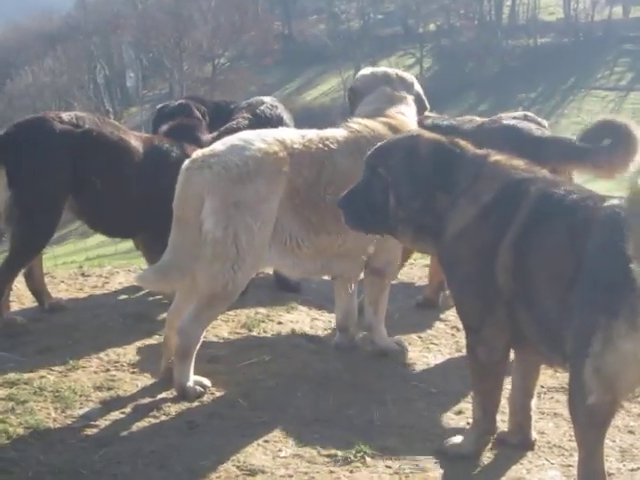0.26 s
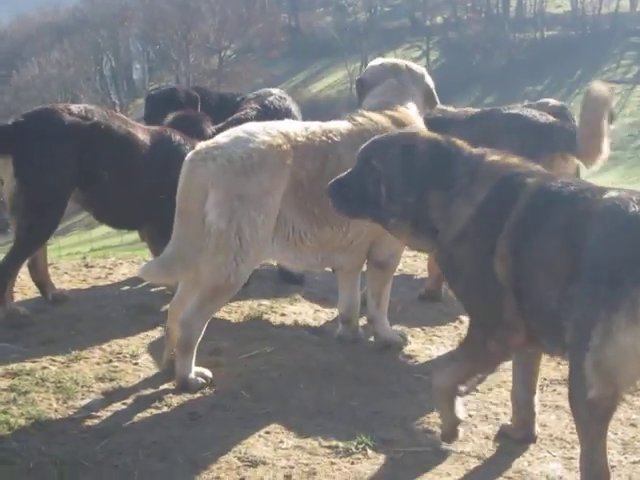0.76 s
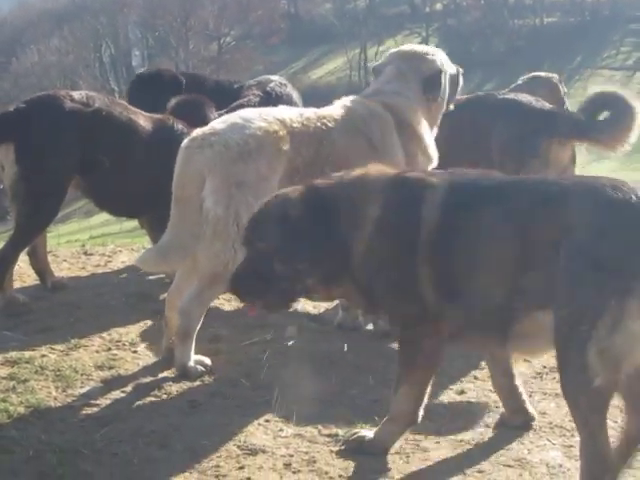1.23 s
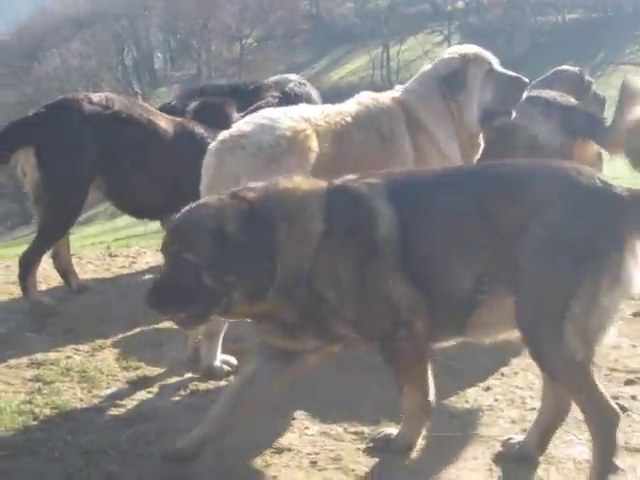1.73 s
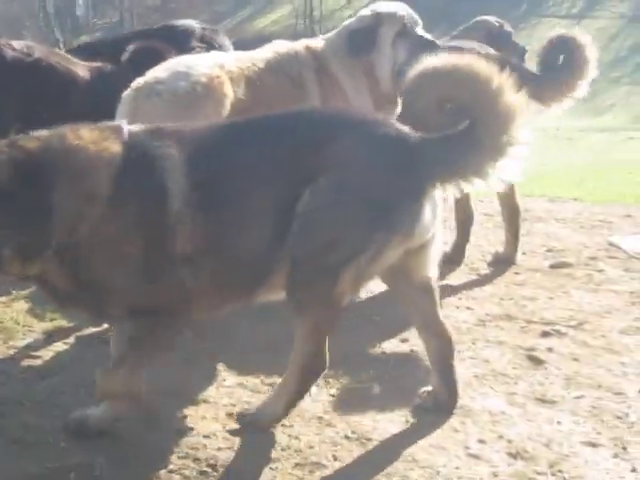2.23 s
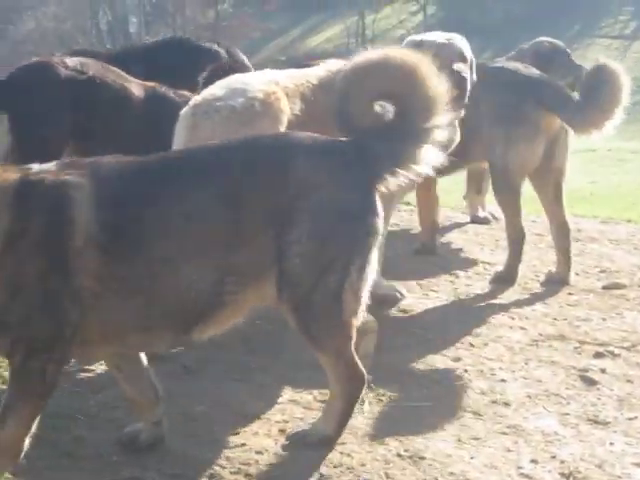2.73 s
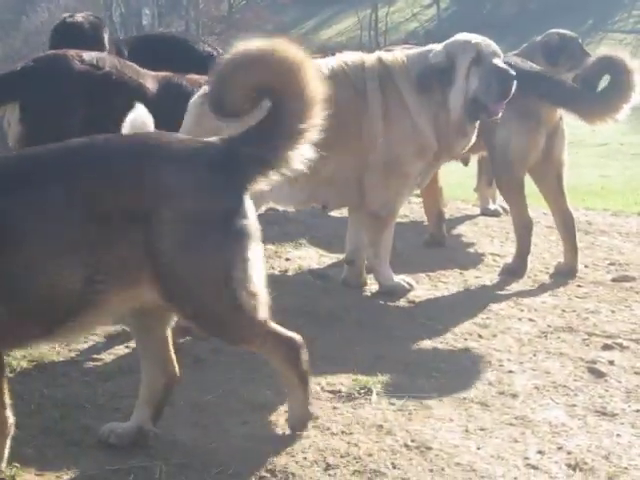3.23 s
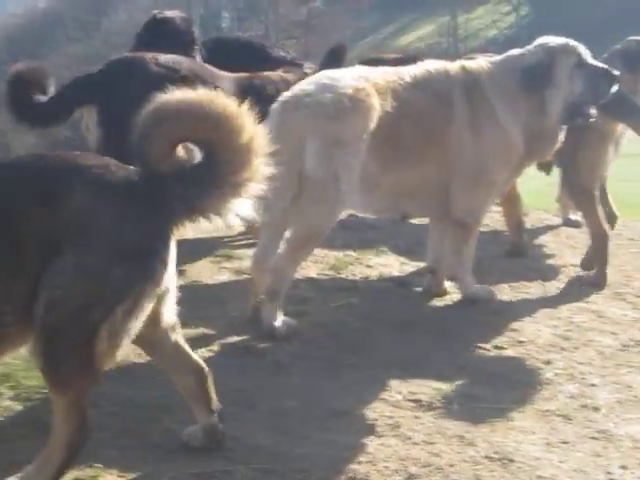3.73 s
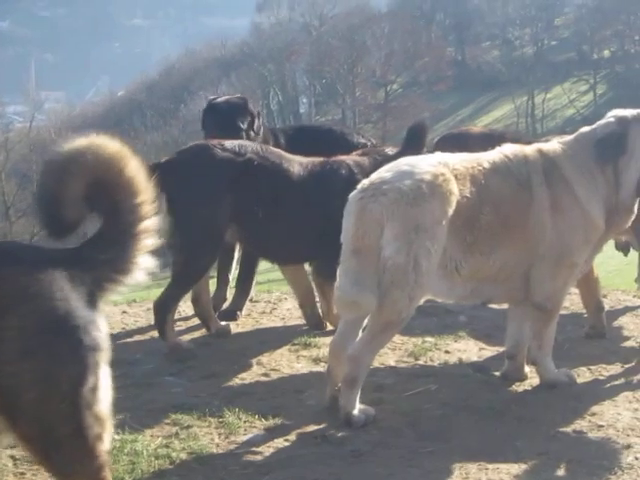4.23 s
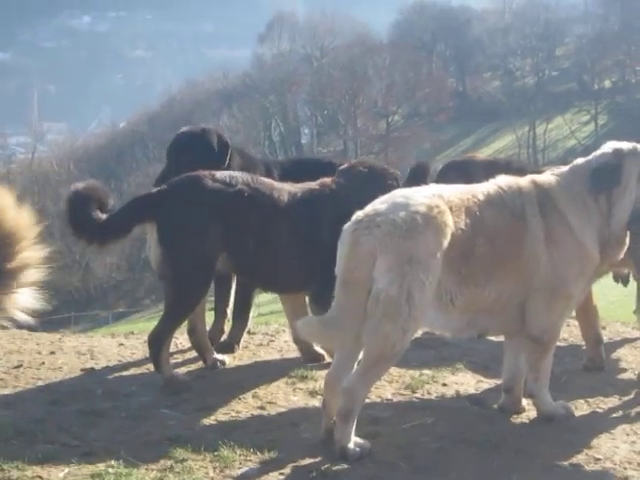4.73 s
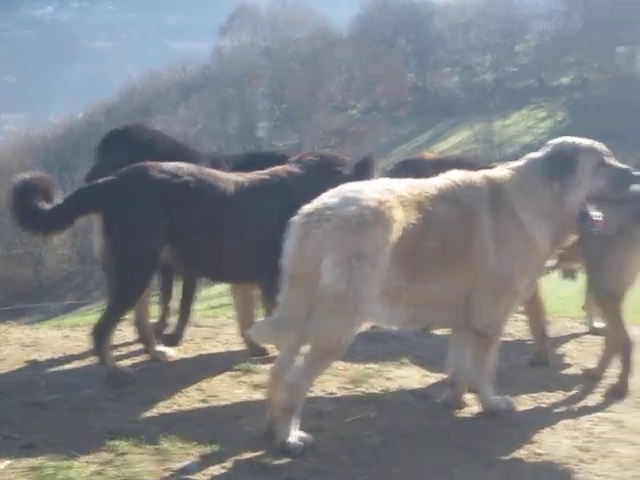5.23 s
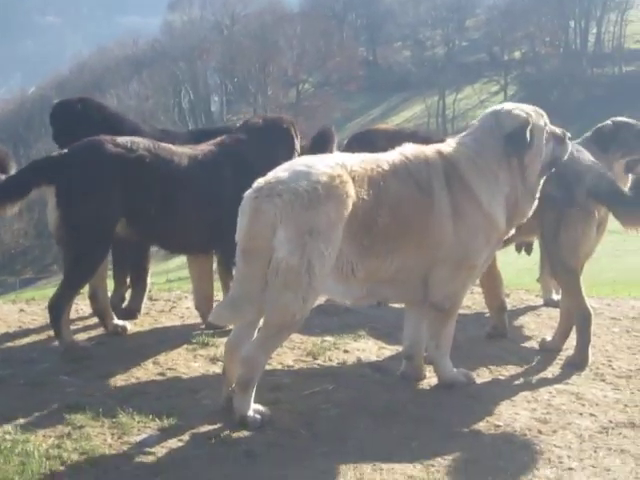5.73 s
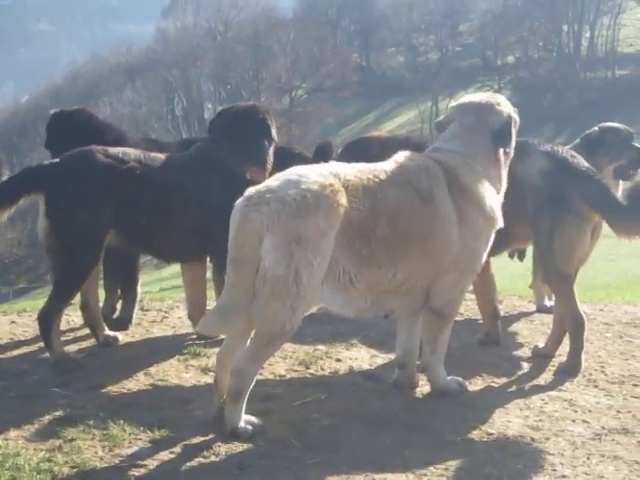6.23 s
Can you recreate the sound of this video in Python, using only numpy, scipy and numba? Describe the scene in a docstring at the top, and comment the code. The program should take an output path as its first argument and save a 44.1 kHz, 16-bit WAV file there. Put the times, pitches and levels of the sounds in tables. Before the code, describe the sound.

On an open hillside, large dogs growl low while paws scrape dry grit. Two of them bark hoarsely together a little after one second, again at two and a half, then at four and a half and five and a half. A short squeal follows the third outburst, thin nasal whines slide about, and faint birds chirp. A small camera microphone gives a slightly dull top and soft background noise.

```python
"""Dogs barking on an open hillside

Two large dogs overlap in hoarse barks: chaotic fold pulses through resonances, rasping breath, partials on top.
A squeal and thin nasal whines are gliding partials; a low growl is slow fold pulses ringing chest, throat, mouth.
Paws scuff dry soil in bursts of grains, small birds chirp on pitch curves, banded noise makes the far air.
A small camera microphone adds faint steady tones, gain control and a cut top."""
import sys
import numpy as np
from scipy import signal
from scipy.io import wavfile
from scipy.ndimage import uniform_filter1d
from numba import njit

SR = 44100
rng = np.random.default_rng(int(sys.argv[2]) if len(sys.argv) > 2 else 0)


def generate_wav(sig):
    """Save sig (samples, or channels by samples) to the path in sys.argv[1] as 16-bit PCM at SR."""
    pcm = np.round(np.clip(np.atleast_2d(sig).T, -1, 1) * 32767).astype(np.int16)
    wavfile.write(sys.argv[1], SR, pcm)


N = 285627


def amp(db):
    """Decibels to gain."""
    return 10 ** (np.asarray(db) / 20)


def rms_one(x):
    """Scale to rms 1."""
    return x / np.sqrt(np.mean(x ** 2) + 1e-20)


def drift(rate_hz, size):
    """Slow chance with rms 1: white noise through two equal one-pole lowpasses."""
    r = np.exp(-2 * np.pi * rate_hz / SR)
    settle = 8000
    noise = rng.standard_normal(size + settle)
    return rms_one(signal.lfilter([1], [1, -2 * r, r * r], noise)[settle:])


def unroll(rows):
    """A table as a slice of time, a 6 ms fade at both ends and its columns sample by sample."""
    s, *columns = np.transpose(rows)
    at = np.arange(round(s[0] * SR), min(round(s[-1] * SR), N))
    fade = np.clip(np.minimum(at - at[0], at[-1] - at) / (.006 * SR), 0, 1)
    return slice(at[0], at[-1] + 1), fade, [np.interp(at / SR, s, c) for c in columns]


@njit
def sweep(x, turn, r):
    """Two-pole resonance whose centre (radians a sample) may move; gain about 1 on top."""
    y = np.zeros(len(x))
    for i in range(2, len(x)):
        drive = (1 - r * r) / 2 * (x[i] - x[i - 2])
        y[i] = drive + 2 * r * np.cos(turn[i]) * y[i - 1] - r * r * y[i - 2]
    return y


def resonate(x, hz, width_hz):
    """A resonance applied twice, so that the valleys stay dark; the width is that of one pass."""
    turn = 2 * np.pi * hz / SR * np.ones(len(x))
    r = np.exp(-np.pi * width_hz / SR)
    return sweep(sweep(x, turn, r), turn, r)


def modes(x, table):
    """Parallel resonances (Hz, width Hz, dB), signs alternating."""
    return sum((-1) ** k * amp(db) * rms_one(resonate(x, hz, width_hz))
               for k, (hz, width_hz, db) in enumerate(table))


def vocal_folds(hz, jitter, breath, spread_db):
    """One pulse a cycle, uneven in time and size, with breath noise released by each opening."""
    phase = np.cumsum(hz * np.exp(jitter * drift(60, len(hz)))) / SR
    pulses = np.diff(np.floor(phase), prepend=0) * amp(spread_db * rng.standard_normal(len(hz)))
    puffs = signal.lfilter([1], [1, -.993], pulses) * rng.standard_normal(len(hz))
    return rms_one(pulses) + breath * rms_one(puffs)


def evened(x, window_s):
    """Divide out the slow level, keep the pulses."""
    return x / np.sqrt(uniform_filter1d(x ** 2, size=round(window_s * SR)) + 1e-12)


def shaped(shape, calls):
    """One shape of glide and loudness, stretched over each call."""
    return [[(s + share * length, first + glide * (last - first), *np.add(db, shape_db))
             for share, glide, *shape_db in shape]
            for s, length, first, last, *db in calls]


def tones(calls, wobble, flutter_db, overtones_db=()):
    """Partials on a pitch curve that wobbles a little; each partial flutters by itself."""
    out = np.zeros(N)
    for rows in calls:
        at, fade, (hz, *partials) = unroll(rows)
        phase = 2 * np.pi * np.cumsum(hz * np.exp(wobble * drift(70, len(hz)))) / SR
        partials += [partials[-1] + db for db in overtones_db]   # higher partials follow the last given one
        for k, db in enumerate(partials, 1):
            level = amp(db + flutter_db * drift(24, len(hz)))
            out[at] += fade * np.sqrt(2) * level * np.sin(k * phase + rng.uniform(0, 2 * np.pi))
    return out


def bark_course(s, held_s, fall_db_per_s, db, shift_db, throat_hz, mouth_db, mouth_hz, end_hz, rasp_db):
    """Effort climbs, holds and falls; the mouth opens on the climb, the throat resonance sags while held."""
    range_db, rise_db_per_s = 30, 270
    mouth_shut_db, mouth_shut_ratio = -23, 0.82   # at the start of the climb
    low_throat_shut_db = -5.5   # the low throat resonance fades while the effort is held
    low_db = db - range_db
    sag_hz = 600 * held_s
    soft_db = rasp_db - 3.5   # weaker rasp on the climb and at both ends of the hold
    start = (s - range_db / rise_db_per_s, low_db, 0, throat_hz,
             mouth_db + mouth_shut_db, mouth_hz * mouth_shut_ratio, soft_db)
    full = (s, db, 0, throat_hz, mouth_db, mouth_hz, soft_db)
    # the rasp itself does not follow the level shift
    middle = (s + held_s / 2, db + shift_db, low_throat_shut_db, throat_hz - sag_hz / 2,
              mouth_db, mouth_hz, rasp_db - shift_db)
    release = (s + held_s, db, low_throat_shut_db, throat_hz - sag_hz, mouth_db, mouth_hz, soft_db)
    end = (s + held_s + range_db / fall_db_per_s, low_db, low_throat_shut_db, throat_hz - sag_hz,
           mouth_db, end_hz, rasp_db)
    return [start, full, middle, release, end]


def hoarse_barks():
    """Chaotic fold pulses ring the throat and the opening mouth; turbulent breath rasps in the upper resonances."""
    # Each row: full effort from in seconds, hold in seconds, fall in dB/s, relative effort level in dB,
    # level shift at mid-hold in dB, throat in Hz, relative mouth level in dB, mouth in Hz while held,
    # mouth in Hz at the end, relative rasp level in dB, narrow-throat level within the rasp in dB.
    barks = [(1.32, .12, 111, -22.5, -7, 520, 10.5, 1140, 1350, -14, -5.5),
             (1.665, 0.014, 234.5, -25.5, -3, 648, -14, 1210, 1230, -22, -13),
             (1.81, 0.066, 160, -26.5, 2, 640, -13, 1160, 1140, -28, -6),
             (2.515, 0.067, 402, -22, 2, 580, 8, 1242, 1210, -19.5, 1),
             (4.58, .11, 217.5, -17.5, 0.5, 626, -4.5, 1160, 980, -26, -2.5),
             (5.495, 0.11, 201, -23.5, 4, 533, 10.5, 1146, 1040, -35, -8)]
    # Upper throat resonances. Each row: centre in Hz, width in Hz, level in dB.
    rasp_modes = [(1900, 400, 5), (2450, 400, 1), (3300, 600, -5), (5400, 800, -13), (8000, 6000, -20)]
    # Low throat resonance: centre in Hz, width in Hz, level in dB re throat before it fades.
    low_hz, low_width_hz, low_db = (314, 220, -5)
    # Resonance excited more or less by each rasp: centre in Hz, width in Hz.
    narrow_throat = (4300, 700)
    out = np.zeros(N)
    for *bark, narrow_db in barks:
        at, fade, (db, shut_db, throat_hz, mouth_db, mouth_hz, rasp_db) = unroll(bark_course(*bark))
        folds = vocal_folds(np.full(len(db), 230.), jitter=.4, breath=3.5, spread_db=1.5)
        breath = rng.standard_normal(len(db)) * amp(2.5 * drift(150, len(db)))
        throat = modes(folds, [(low_hz, low_width_hz, low_db + shut_db), (throat_hz, 280, 0)])
        mouth = resonate(folds, mouth_hz, 312)
        rasp = modes(breath, rasp_modes + [(*narrow_throat, narrow_db)])
        voice = amp(-1.5) * evened(throat, 0.012) - amp(mouth_db - 11.5) * evened(mouth, 0.026)
        out[at] += fade * amp(db) * (voice + amp(rasp_db) * evened(rasp, .03))
    return out


def deep_voice():
    """Tonal part of the deeper dog: partials whose pitch climbs to a plateau."""
    # Each row: start in seconds, length in seconds, first Hz, last Hz, relative dB of partials 1, 2, 3.
    calls = [(1.276, 0.098, 273.3, 336.5, -25.5, -26, -27.5), (1.382, 0.054, 358.2, 360, -54, -16.5, -44),
             (1.451, .1, 269, 291, -30, -27, -40.5), (1.765, 0.15, 181.4, 253.2, -34.5, -30.5, -32.5),
             (2.458, 0.15, 181.7, 323.7, -31.5, -50, -33.5), (4.539, .1, 199.4, 335.4, -21, -23, -28.5),
             (4.66, 0.11, 230, 267, -33.5, -40, -46), (5.459, 0.17, 188, 323.2, -20.5, -21.5, -33.5)]
    # Each row: share of length, share of the glide, dB added to partials 1, 2, 3.
    shape = [(0, 0, -16.5, -28, -25.5), (.2, .6, -8.5, -31, -13), (.4, 0.82, -6.5, 0, -6.5),
             (.7, 1, -1, -3.5, 5.5), (1, .97, -28.5, -20.5, -11.5)]
    # Partials 4 and 5, dB re partial 3.
    overtones_db = [-11, -13]
    return tones(shaped(shape, calls), wobble=0.027, flutter_db=5.0, overtones_db=overtones_db)


def high_voice():
    """Tonal part of the higher dog: partials whose pitch moves between two ends over each call."""
    # Each row: start in seconds, length in seconds, first Hz, last Hz, relative dB of partials 1, 2, 3.
    calls = [(1.335, .16, 501, 480, -17, -21.5, -38.5), (1.54, 0.077, 462, 485, -28.5, -38, -29),
             (1.61, 0.0895, 495.7, 459.5, -28, -48, -36.5), (2.47, .14, 539.4, 513, -29, -35, -69),
             (4.595, .125, 553, 489.7, -15.5, -19, -32.5), (5.515, 0.098, 489, 488, -15, -31, -57)]
    # Each row: share of length, share of the glide, dB added to partials 1, 2, 3.
    shape = [(0, .25, -7.5, -18, 2), (.25, 0.0081, 1.5, -1, 3.5), (.5, .1, 2, 0, 5),
             (.78, 0.86, 0, -11, -6.5), (1, 0.66, -17, -14, -12)]
    return tones(shaped(shape, calls), wobble=.014, flutter_db=2.5, overtones_db=[-19, -21, -32, -28])


def hillside(x):
    """Dull scattered echo from slope and trees: decaying lowpassed noise as impulse response."""
    t60_s, level_db, cut_hz = .5, -28, 1200
    t = np.arange(SR // 2) / SR
    scatter = rng.standard_normal(len(t)) * amp(-60 * t / t60_s) * (t > .02)
    scatter = signal.sosfilt(signal.butter(2, cut_hz, fs=SR, output="sos"), scatter)
    return amp(level_db) * signal.fftconvolve(x, scatter / np.linalg.norm(scatter))[:N]


def squeal():
    """Nearly steady tone with two overtones after a bark."""
    # Each row: time in seconds, pitch in Hz, level in dB.
    curve = [(4.7, 1530, -48), (4.76, 1543, -32.5), (4.785, 1534, -37.5), (4.815, 1572, -28.5),
             (4.86, 1567, -42), (4.89, 1553, -44.5), (4.96, 1530, -60)]
    # Partials 2 and 3, dB re partial 1.
    overtones_db = [-14, -27.5]
    return tones([curve], wobble=.006, flutter_db=3, overtones_db=overtones_db)


def whines():
    """Gliding nasal whines, one partial each."""
    # One list per whine. Each row: time in seconds, pitch in Hz, level in dB.
    curves = [
        [(1.54, 3680, -50), (1.6, 3744, -48.5), (1.69, 3390, -52), (1.75, 2860, -56.5), (1.85, 2760, -54),
         (2.0, 2410, -67), (2.12, 2130, -65)],
        [(2.432, 2600, -51), (2.49, 2590, -65)],
        [(2.99, 5600, -66), (3.06, 5320, -69), (3.13, 5400, -67), (3.17, 4930, -67), (3.24, 4700, -68)],
        [(4.93, 8800, -77), (5.13, 8800, -75), (5.25, 8900, -74), (5.29, 7100, -78), (5.33, 5650, -64),
         (5.4, 4400, -57.5), (5.48, 3630, -58)],
        [(5.63, 5350, -67), (5.69, 5700, -61), (5.74, 5740, -74)],
        [(5.755, 4900, -65), (5.8, 4750, -60), (5.85, 4640, -54), (5.91, 3820, -44), (5.97, 3850, -64),
         (6.04, 3800, -65), (6.1, 3260, -57), (6.22, 3470, -56.5), (6.28, 3310, -55.5), (6.35, 2870, -61)],
    ]
    return tones(curves, wobble=.008, flutter_db=2.2)


def growl():
    """Slow separate fold pulses ring the chest, the throat and the half-shut mouth."""
    # Each row: start in seconds, length in seconds, chest dB at first, chest dB at last,
    # throat dB re chest at first, mouth dB re chest at first.
    bouts = [(0.112, 0.34, -48.5, -38.5, -7, -14), (0.947, 0.36, -44.5, -45, -7.5, -10),
             (1.833, 0.52, -38, -46, -2.5, -1), (2.41, 0.17, -45, -43, -1, -5),
             (3.02, 0.52, -42.5, -39, -4, -1.5), (3.763, 0.623, -44, -48.5, -2.5, -5),
             (4.47, 0.13, -40.5, -45, 5.5, -19), (4.747, 0.96, -38.5, -49.5, -0.5, -1),
             (6.022, 0.69, -35.5, -42.5, -7, 0.5)]
    # Chest resonances. Each row: centre in Hz, width in Hz, level in dB.
    chest_modes = [(75.2, 54, 2.5), (130, 87, -15.5), (196.3, 74, -3)]
    # Throat resonance: centre in Hz, width in Hz.
    throat_mode = (290.5, 176)
    # Mouth resonances. Each row: centre in Hz, width in Hz, level in dB.
    mouth_modes = [(545, 75, 0), (1190, 80, -15)]
    rise_db_per_s, fall_db_per_s = 346, 204.5
    throat_swell_db, mouth_swell_db = 3, -7.5   # over each bout the throat fills and the mouth closes
    pulses_per_s = 69 * np.exp(.05 * drift(3, N))
    folds = vocal_folds(pulses_per_s, jitter=.05, breath=0.85, spread_db=2.0)
    chest = evened(modes(folds, chest_modes), .15)
    throat = evened(resonate(folds, *throat_mode), .15)
    mouth = evened(modes(folds, mouth_modes), .15)
    out, t = np.zeros(N), np.arange(N) / SR
    for s, length, first_db, last_db, throat_db, mouth_db in bouts:
        done = np.clip((t - s) / length, 0, 1)
        db = first_db + (last_db - first_db) * done
        db -= rise_db_per_s * np.maximum(s - t, 0)
        db -= fall_db_per_s * np.maximum(t - s - length, 0)
        out += amp(db) * (chest + amp(throat_db + throat_swell_db * done) * throat
                          + amp(mouth_db + mouth_swell_db * done) * mouth)
    return out


def grit(per_s, size):
    """Random grains of uneven size."""
    sizes = amp(3.4 * np.minimum(rng.exponential(1, size), 5)) * rng.choice([-1, 1], size)
    return rms_one(sizes * (rng.random(size) < per_s / SR))


def scuffs():
    """Each paw crushes and drags grit in a burst; longer drags also swell more slowly."""
    # Paws on dry soil. Each row: start in seconds, relative level in dB, grit centre in Hz, t60 in seconds.
    paws = [(.04, -44, 9100, 0.14), (0.454, -28.5, 4900, 0.13), (0.471, -19, 2160, 0.039),
            (0.504, -29.5, 4440, 0.086), (.65, -18, 10500, 0.015), (0.651, -24.5, 3900, 0.098),
            (.72, -41, 11000, 0.2), (1.153, -34.5, 5400, 0.073), (1.838, -25.5, 3870, 0.15),
            (2.01, -37.5, 5300, 0.35), (2.813, -30.5, 4670, 0.1), (2.929, -40, 7600, 0.26),
            (3.32, -42, 10000, 0.13), (3.7, -40, 10000, 0.11), (4.135, -26.5, 2300, 0.055),
            (4.17, -45, 2500, 0.055), (4.28, -46, 9000, 0.41), (5.285, -29.5, 4200, 0.045),
            (6.088, -33, 4500, .06)]
    out, t = np.zeros(N + SR), np.arange(SR // 2) / SR
    band = signal.butter(2, [1800, 11000], "band", fs=SR, output="sos")
    for s, db, hz, t60_s in paws:
        grains = grit(17000, len(t))
        t60_s = np.clip(t60_s, .005, 1)
        broad = signal.sosfilt(band, grains)
        peak = resonate(grains, hz, 0.61 * hz)
        shape = np.minimum(t / (.2 * t60_s), 1) * amp(db - 11 - 60 * t / t60_s)
        i = round(s * SR)
        out[i:i + len(t)] += shape * (rms_one(peak) + .3 * rms_one(broad))
    return out[:N]


def birds():
    """Single chirps and flicks, a repeated phrase and a fast trill, each one partial on a pitch curve."""
    # Chirps, quick glides that settle. Each row: start in seconds, length in seconds, first Hz, last Hz,
    # dB before the shape.
    chirps = [(2.99, .07, 7200, 7600, -64), (3.222, 0.081, 6700, 7420, -56),
              (3.53, 0.057, 6400, 6830, -61.5), (6.14, .04, 4220, 5050, -64)]
    # Each row: share of length, share of the glide, dB added.
    chirp_shape = [(0, 0.12, -13), (.3, .9, 1), (1, 1, 2)]
    # Steep flicks, near-straight glides; columns as for chirps.
    flicks = [(3.625, .035, 7000, 4750, -64), (6.215, 0.032, 3800, 5000, -64),
              (6.258, 0.031, 6900, 5400, -63)]
    # Columns as for the chirp shape.
    flick_shape = [(0, 0, 1), (.6, 0.51, 4), (1, 1, -1)]
    # Phrases of one bird. Each row: start in seconds, length in seconds, reference Hz, dB before the shape.
    phrases = [(3.698, 0.087, 6700, -56.5), (3.92, 0.098, 6580, -57.5), (4.225, 0.1, 6660, -58),
               (4.47, 0.11, 6500, -57), (4.715, 0.096, 6600, -57)]
    # Dip and rise. Each row: share of length, pitch ratio, dB added.
    phrase_shape = [(0, .87, -6), (.14, .94, -2), (.43, .86, -5), (.52, .95, -3), (.86, 1.03, 0),
                    (1, .82, -6)]
    # Each row: time in seconds, centre in Hz, level in dB.
    trill = [(6.14, 7750, -73), (6.2, 7200, -67), (6.24, 6860, -67), (6.32, 6630, -62), (6.36, 7190, -66),
             (6.41, 6700, -64)]
    curves = shaped(chirp_shape, chirps) + shaped(flick_shape, flicks)
    curves += [[(s + share * length, hz * ratio, db + shape_db) for share, ratio, shape_db in phrase_shape]
               for s, length, hz, db in phrases]
    return tones(curves, wobble=.006, flutter_db=1.5) + tones([trill], wobble=.04, flutter_db=4)


def air():
    """Far noise of the valley, coloured band by band and gently patchy."""
    # Each row: frequency in Hz, relative density in dB per Hz.
    table_hz, table_db = np.transpose([(12, -35), (20, -1), (76, -1), (232, -7.5), (519, -7.5),
                                       (649, -12.5), (906, -8), (1500, -18), (2540, -23), (5690, -34),
                                       (7730, -35.5), (15500, -48.5)])
    level_db, patchy_db = -44, 1.1
    out, together = 0, drift(1.5, N)
    low_edges = 20 * 2 ** np.arange(0, 10, .5)   # half octaves
    high_edges = np.minimum(low_edges * np.sqrt(2), 17000)
    white = rng.standard_normal((2, N))   # neighbouring bands use different noise
    for k, (low, high) in enumerate(zip(low_edges, high_edges)):
        band = signal.sosfilt(signal.butter(2, [low, high], "band", fs=SR, output="sos"), white[k % 2])
        band_db = np.interp(np.log(low * high) / 2, np.log(table_hz), table_db)
        alone = drift(12, N // 8 + 1).repeat(8)[:N]   # 1.5 Hz after the repeat
        out = out + band * amp(band_db + patchy_db * (together + alone))
    return amp(level_db) * rms_one(out)


def rustle():
    """Dry leaves and soil: sparse grains, bandpassed, drifting in level."""
    band = signal.butter(2, [3000, 12000], "band", fs=SR, output="sos")
    grains = signal.sosfilt(band, grit(1500, N))
    return amp(-71.5 + 2.46 * drift(0.64, N)) * rms_one(grains)


def scene():
    """Dogs with their echo, paws, birds and air."""
    barks = amp(3.5) * (hoarse_barks() + deep_voice() + high_voice())
    dogs = barks + hillside(barks) + squeal() + whines() + growl()
    return (dogs + scuffs() + birds() + air() + rustle())[None]


def camera_whine():
    """Faint steady sines."""
    # Each row: frequency in Hz, rms level in dB ahead of the gain control.
    lines = [(7852, -79), (7882, -80), (7359, -88)]
    t = np.arange(N) / SR
    return sum(amp(db) * np.sqrt(2) * np.sin(2 * np.pi * hz * t) for hz, db in lines)


def gain_control(x):
    """Gain drops on loud sound and recovers slowly, at a constant rate in dB."""
    knee_db, squeeze, recover_db_per_s = -20, 0.54, 11
    level_db = 10 * np.log10(uniform_filter1d(x[0] ** 2, size=1000) + 1e-12)
    ramp_db = recover_db_per_s * np.arange(N) / SR
    wanted_db = squeeze * np.maximum(level_db - knee_db, 0)
    cut_db = np.maximum.accumulate(wanted_db + ramp_db) - ramp_db
    return x * amp(-signal.lfilter([.002], [1, -.998], cut_db))


def record(dry):
    """Camera microphone: faint whine, gain control, steep lowpass."""
    x = gain_control(dry + camera_whine())
    cutoff_hz = 15655
    return signal.sosfilt(signal.ellip(12, .5, 70, cutoff_hz, fs=SR, output="sos"), x)


dry = scene()
out = record(dry)
generate_wav(out)
```